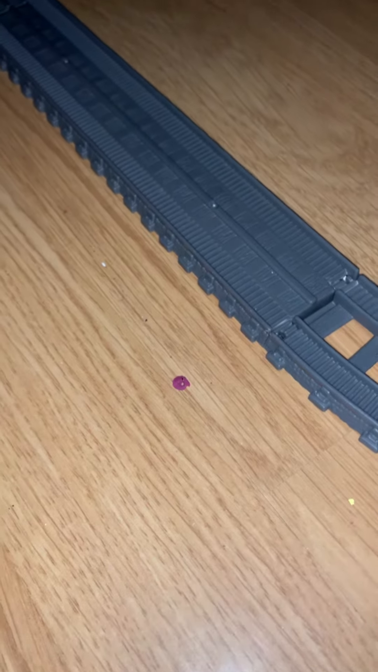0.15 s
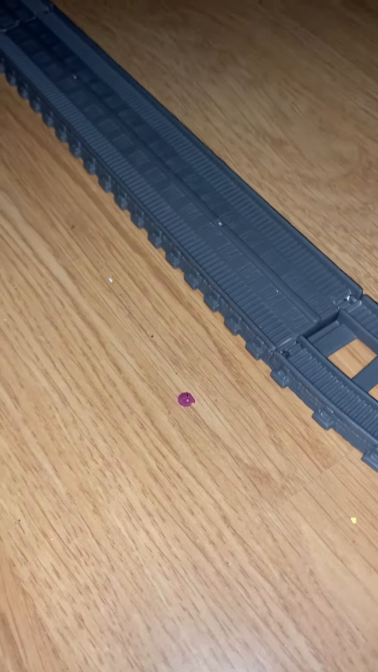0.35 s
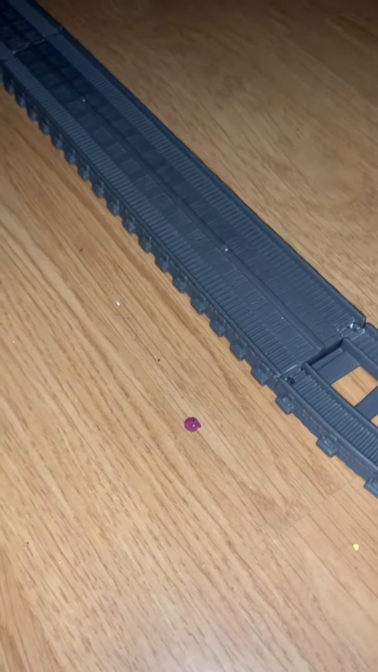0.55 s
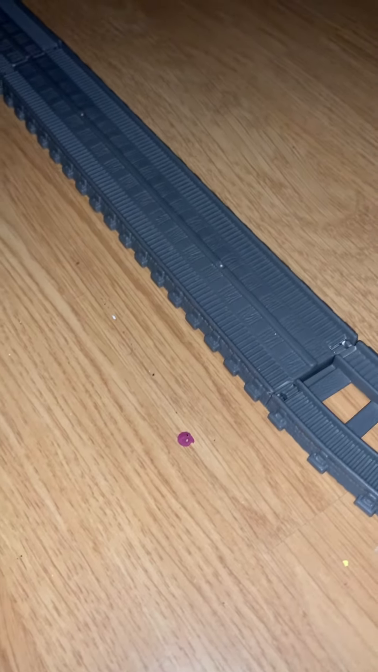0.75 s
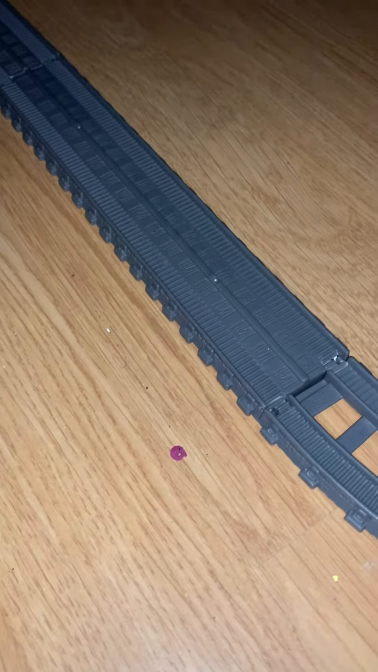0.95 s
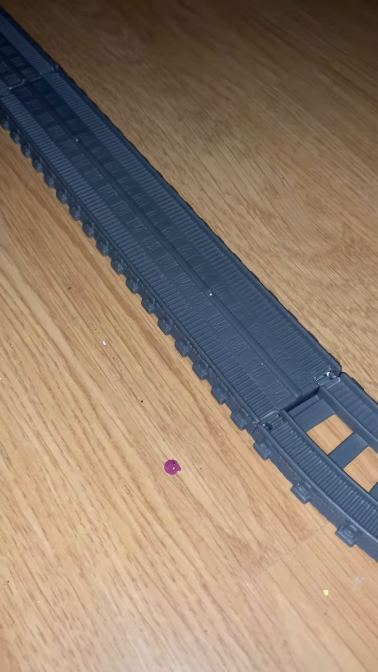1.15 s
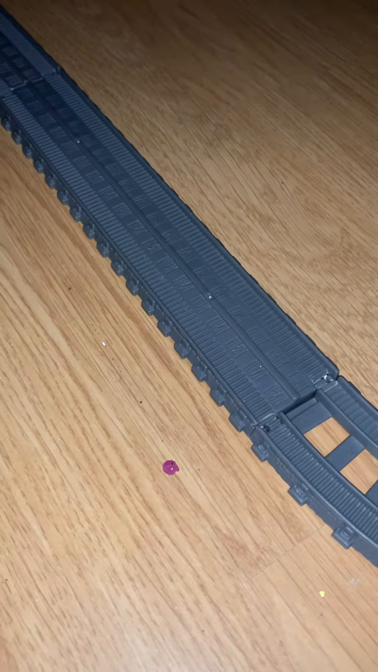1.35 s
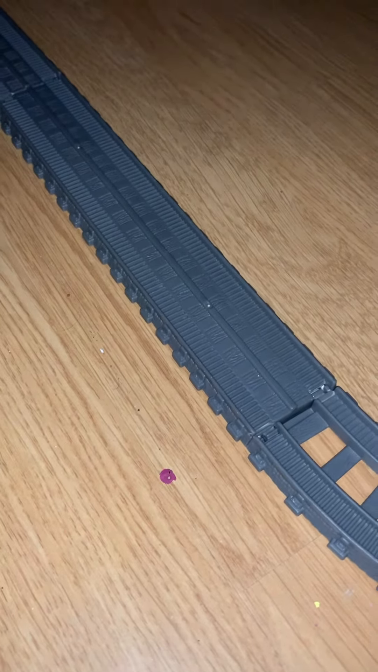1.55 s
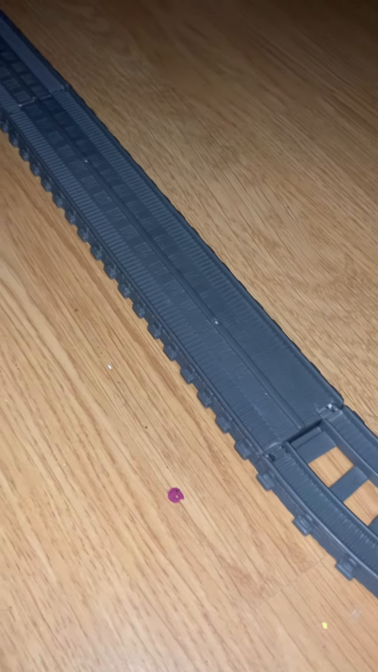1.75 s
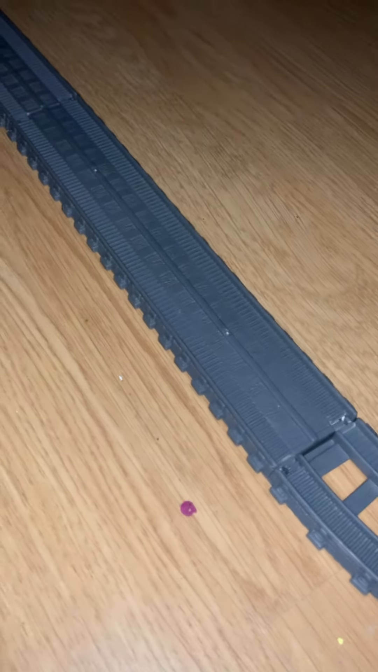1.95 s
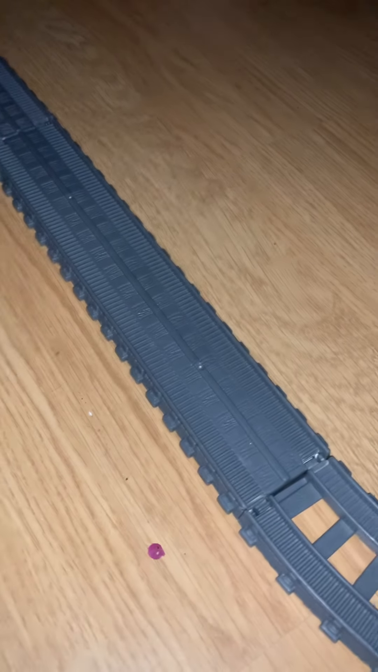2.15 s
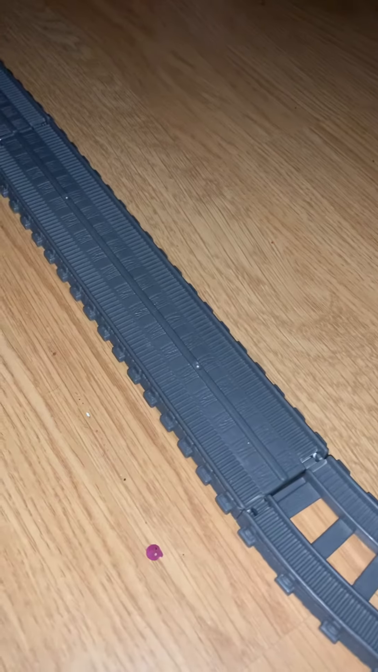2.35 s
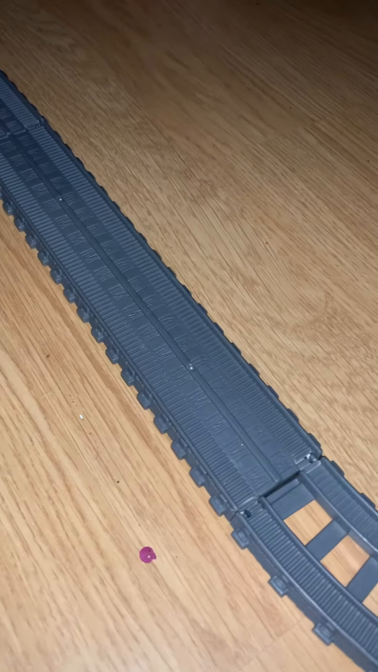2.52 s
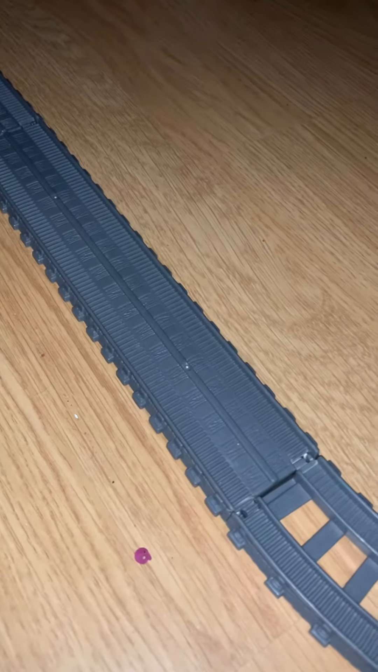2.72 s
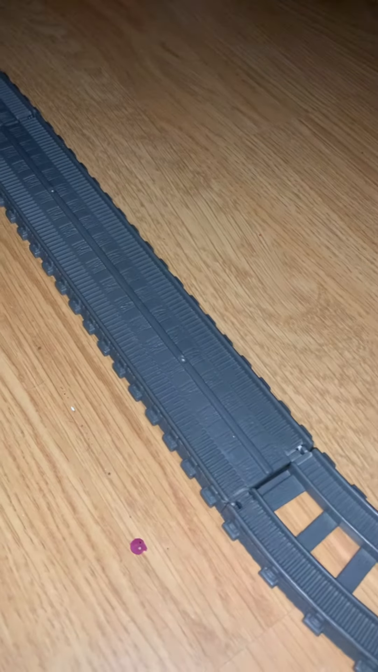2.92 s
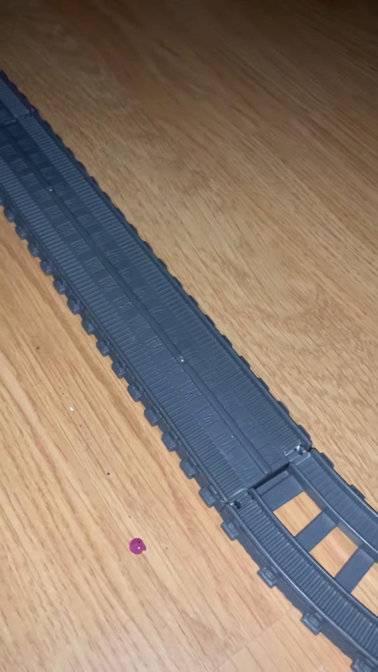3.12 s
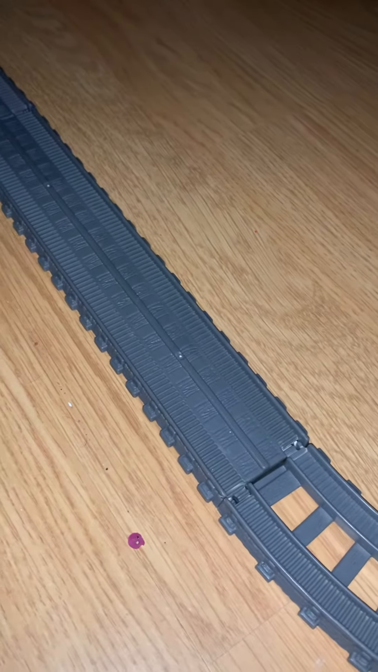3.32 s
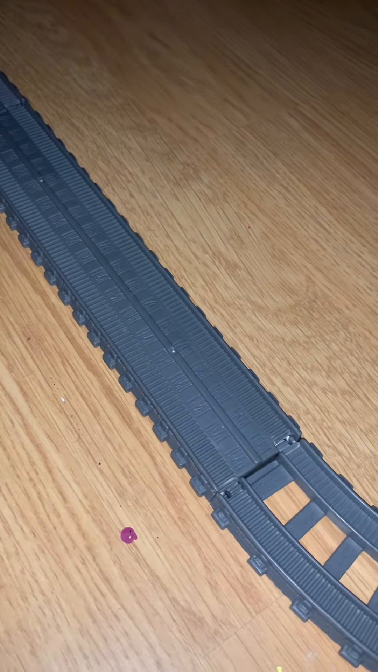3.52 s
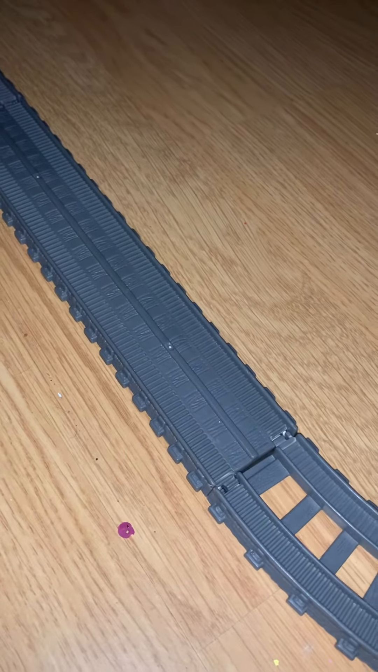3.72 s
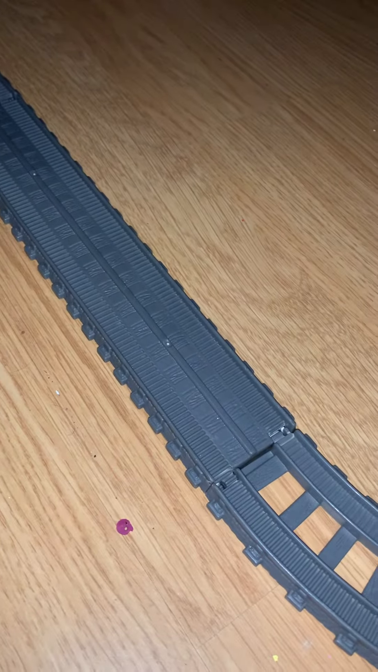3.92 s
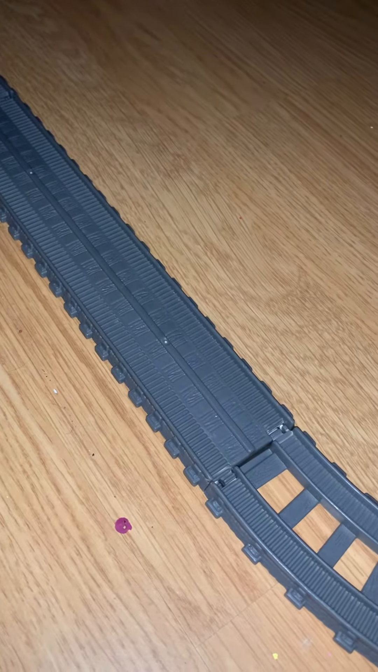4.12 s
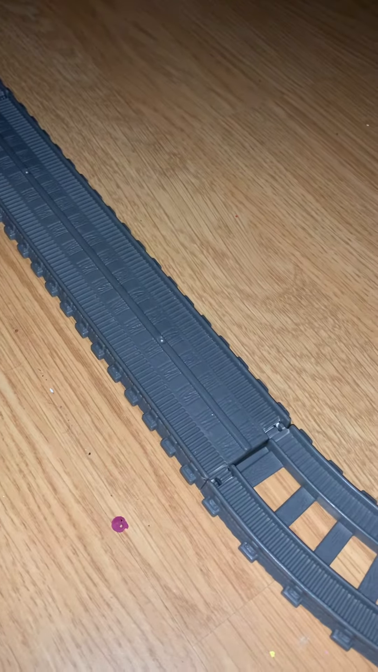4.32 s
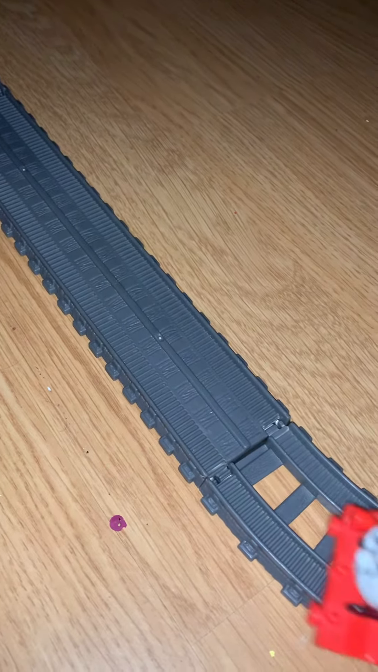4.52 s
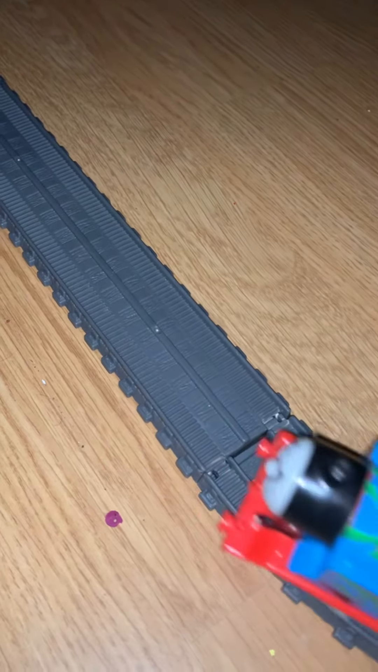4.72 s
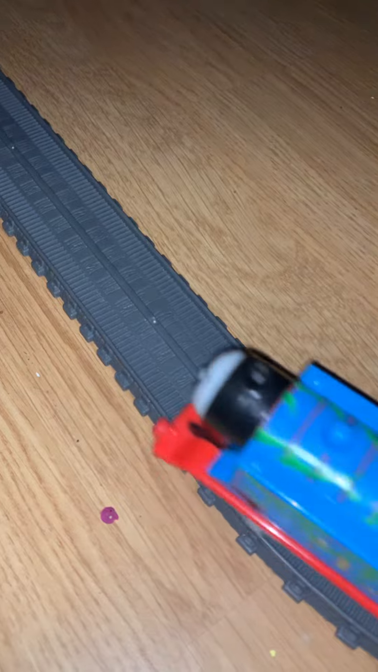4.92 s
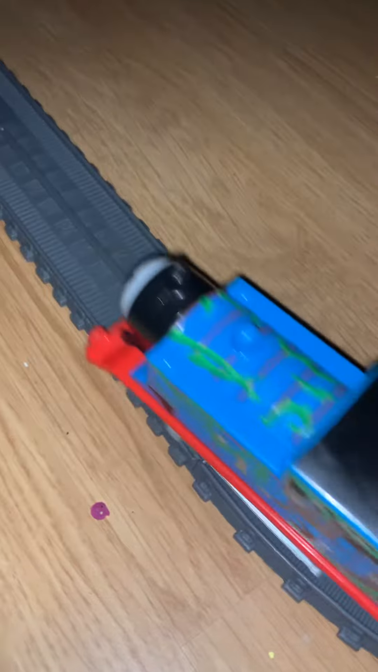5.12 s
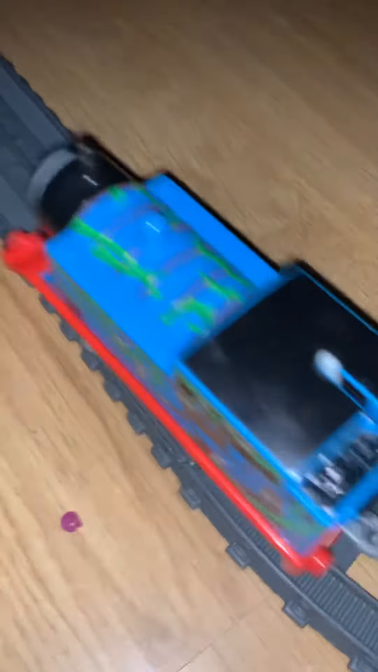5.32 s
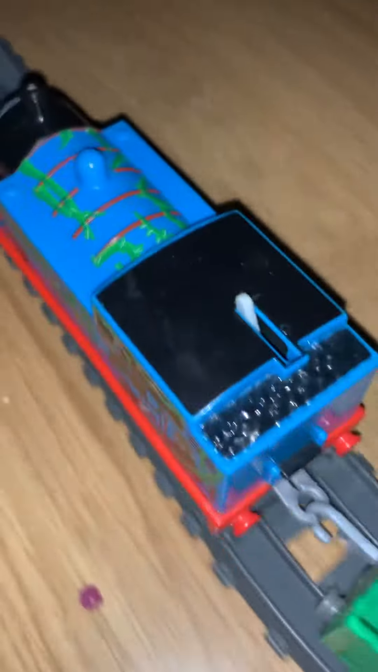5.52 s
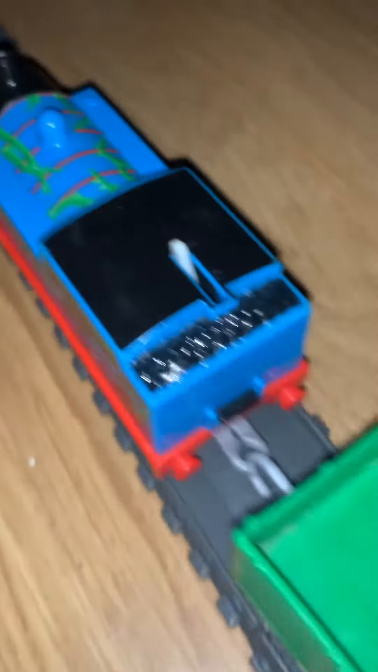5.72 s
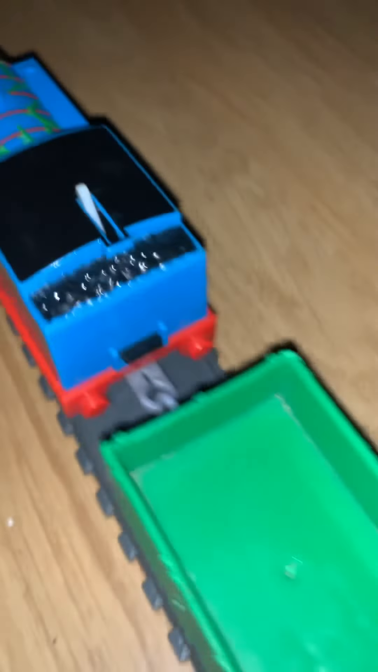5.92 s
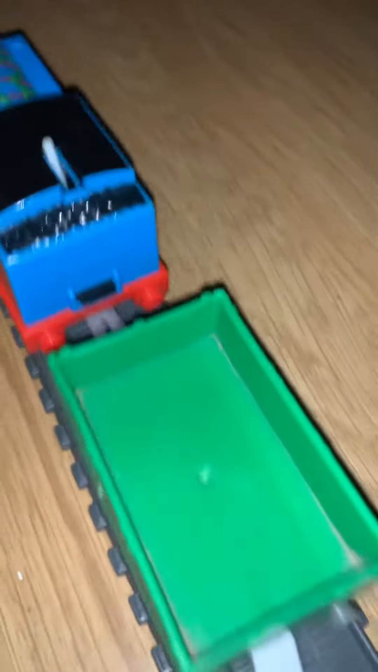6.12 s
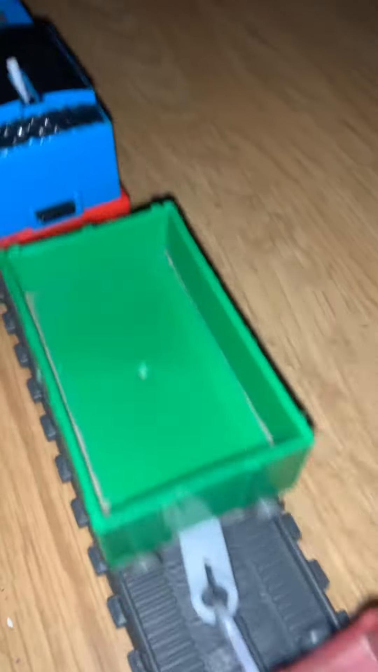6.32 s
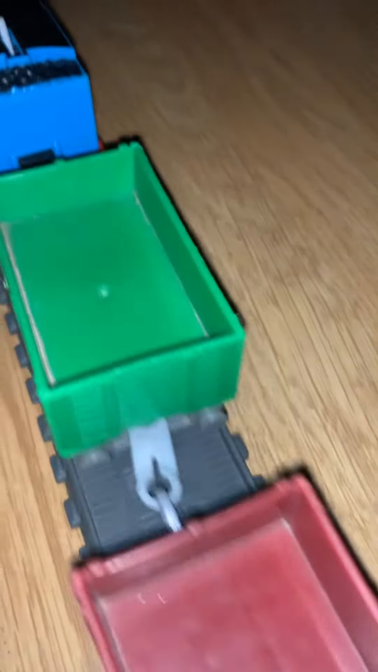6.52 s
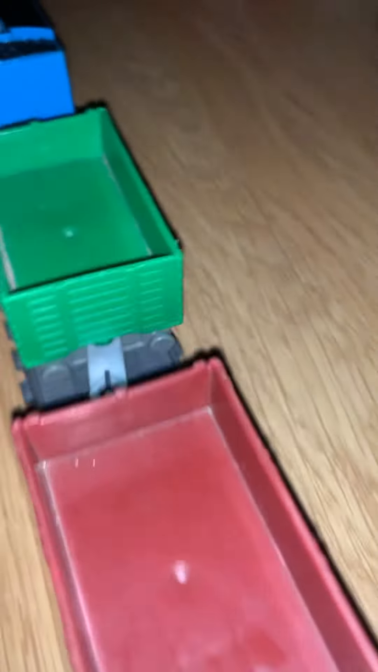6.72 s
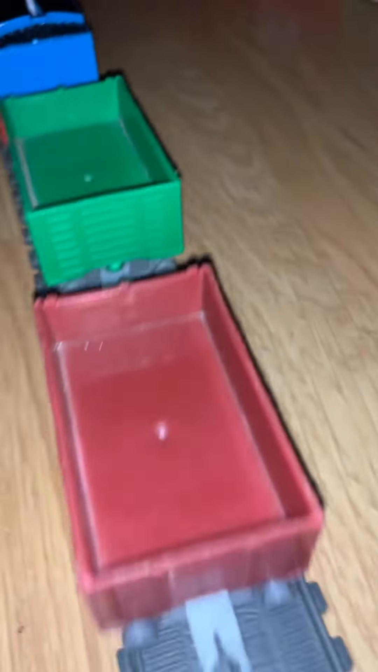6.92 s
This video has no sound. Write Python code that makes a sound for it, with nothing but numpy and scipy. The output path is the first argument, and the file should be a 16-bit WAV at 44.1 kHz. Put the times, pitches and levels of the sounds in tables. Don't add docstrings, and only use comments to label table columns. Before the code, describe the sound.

Uneven plastic ticking and gear whirr swell as a small toy train approaches on a wooden floor and passes the microphone with clacking wagons.

```python
import sys
import numpy as np
from scipy import signal
from scipy.fft import rfft, irfft, next_fast_len
from scipy.io import wavfile
from scipy.ndimage import map_coordinates

SR = 44100
rng = np.random.default_rng(int(sys.argv[2]) if len(sys.argv) > 2 else 0)


def invert_db(level):
    return 10 ** (np.asarray(level, dtype=float) / 20)


def pcm_store(signal):
    levels = np.round(np.clip(np.atleast_2d(signal), -1, 1) * 32767)
    wavfile.write(sys.argv[1], SR, levels.astype(np.int16).T)


N = 311346

# time in seconds, stage (0 far, 1 round the bend, 2 passing).
APPROACH = [
    (0, 0.04),
    (1.6, 0.034),
    (3.4, 0.69),
    (4.1, 0.81),
    (5.3, 1.34),
    (5.9, 2.01),
    (7.06, 1.74),
]
# time in seconds, shell rattle in dB, wheel pressure on the floor in dB.
RUN = [(0, -51.5, 1), (.75, -46.5, -0.5), (1.3, -46, -6), (1.58, -46.5, -4), (1.75, -44, 4),
       (2.4, -43, -4.5), (2.56, -36.5, -2), (2.85, -38.5, 1.5), (2.97, -45.5, 2), (3.8, -45.5, 0.5),
       (3.95, -37.5, -4.5), (4.5, -40.5, -0.5), (4.8, -41, -5.5), (5.15, -40.5, -4), (5.45, -32.5, -4.5),
       (5.67, -31, -6.5), (5.85, -28, -5), (7.06, -30, -4)]
# time in seconds, slack in dB.
SLACK = [(0, 1), (.85, -2.5), (.95, -3.5), (1.95, -2.5), (2.3, -4.5), (3.0, -1), (3.8, 0), (5.0, 2.5),
         (5.65, 4.5), (5.85, 1.5), (7.06, -1.5)]

# time in seconds, peak in dB, panel pitch in Hz.
ENGINE_KNOCKS = [(1.6244, -30, 1500), (1.732, -31, 1570), (2.0784, -24.5, 1840), (2.1204, -20.5, 2000),
                 (2.3444, -32, 1490), (2.5379, -49, 1570), (2.601, -26, 1490), (2.7851, -24, 1490),
                 (2.859, -21, 1910), (3.1473, -25.5, 1550), (3.278, -21.5, 1450), (3.298, -18.5, 1730),
                 (3.354, -22, 1500), (3.482, -28.5, 1530), (3.5224, -28, 1470), (3.6952, -23, 1800),
                 (3.895, -28.5, 1930), (4.2513, -37, 2070), (4.31, -21, 2000), (4.4473, -21, 2070),
                 (4.5332, -50, 2050), (4.5655, -37, 2160), (4.6412, -17, 2050), (4.6778, -28, 1770),
                 (4.8928, -22.5, 2050)]
WAGON_KNOCKS = [(4.956, -19, 1710), (4.991, -15, 1760), (5.01, -24, 1960), (5.0244, -14, 2000),
                (5.057, -19, 1830), (5.181, -29, 1700), (5.194, -18, 1680), (5.273, -22, 1940),
                (5.3374, -18.5, 1780), (5.3787, -16, 1680), (5.4067, -10.5, 1930), (5.467, -32, 1830),
                (5.624, -33, 1610), (5.8085, -14, 2010), (5.9464, -9, 2000), (6.0215, -11, 1840),
                (6.1067, -18, 2050), (6.3385, -32, 2060), (6.428, -30, 2060), (6.4934, -15, 2050),
                (6.545, -13.5, 1830), (6.7292, -14, 1890), (6.7422, -16, 2010), (6.8942, -16.5, 2290),
                (7.0427, -16, 2020)]
# time in seconds, peak in dB, panel pitch in Hz.
FURTHER_KNOCKS = [(1.0922, -42, 1530), (1.1303, -32.5, 1550), (1.5154, -40, 1570), (1.606, -40, 1560),
                  (1.734, -25, 1540), (1.794, -27, 1610), (1.8744, -36, 1540), (1.897, -37, 1440),
                  (1.907, -33, 1580), (2.1107, -30, 1730), (2.27, -26.5, 1590), (2.301, -28.5, 1560),
                  (2.415, -25.5, 1550), (2.468, -32, 1650), (2.541, -20, 1650), (2.6133, -22.5, 1590),
                  (2.6378, -23, 1580), (2.7305, -30, 1550), (2.789, -28, 1650), (2.8623, -20, 1850),
                  (3.041, -30, 1650), (3.0603, -29, 1590), (3.074, -32, 1580), (3.115, -29, 1500),
                  (3.1232, -23, 1450), (3.357, -34, 1640), (3.5339, -30, 1650), (3.7067, -24.5, 2000),
                  (3.994, -26, 1660), (4.0542, -25, 1800), (4.2281, -20, 2010), (4.254, -17.5, 2070),
                  (4.4, -21, 2020), (4.4261, -22, 2050), (4.534, -15.5, 2020), (4.569, -22, 2000),
                  (4.632, -18.5, 1900), (4.6348, -17, 2000), (4.6444, -13, 2050), (4.683, -20, 1860),
                  (4.7878, -22.5, 1970), (4.8283, -26.5, 1890), (4.846, -25.5, 1980), (4.9063, -24, 1810),
                  (5.1185, -23, 1800), (5.1831, -11.5, 1810), (5.1933, -13.5, 1740), (5.3803, -29, 1720),
                  (5.4053, -13, 1870), (5.4082, -11.5, 1940), (5.5146, -41, 1800), (5.5846, -23, 1980),
                     (5.6261, -13, 1760), (5.6686, -24, 2000), (5.7456, -18.5, 2360), (5.7723, -23, 2100),
                     (5.8226, -18, 2020), (5.957, -29, 2050), (6.0145, -16.5, 2070), (6.0493, -14, 1870),
                     (6.1212, -17.5, 2210), (6.1345, -34, 2080), (6.1588, -26, 2090), (6.1774, -22, 2020),
                     (6.2687, -16.5, 2260), (6.2844, -34, 2060), (6.293, -20, 2330), (6.3044, -20, 2270),
                     (6.3299, -17, 2300), (6.3484, -13, 2050), (6.397, -18, 2080), (6.419, -19, 1900),
                     (6.4513, -17, 1960), (6.4874, -19, 1840), (6.4956, -17, 1880), (6.5268, -18, 1890),
                     (6.5755, -18.5, 1750), (6.6063, -14, 2200), (6.6398, -14.5, 2200), (6.652, -15.5, 1730),
                     (6.662, -17, 2090), (6.686, -17, 1980), (6.7324, -21, 2050), (6.752, -17, 2370),
                     (6.7667, -19, 2080), (6.7794, -15.5, 2260), (6.8073, -12, 2000), (6.839, -17.5, 2000),
                     (6.924, -18, 2040), (6.9517, -30, 1840), (6.9831, -19, 2000), (7.0098, -15, 2160),
                     (7.0298, -13, 2090)]
# time in seconds, peak in dB.
PINGS = [(0.3878, -38), (0.6324, -38), (0.7392, -37), (0.8241, -35), (0.8928, -35), (1.0405, -39),
         (1.1345, -36), (1.2805, -35), (1.3637, -37), (1.4528, -36), (1.6267, -36), (1.7692, -36),
         (1.819, -36), (2.0446, -35), (2.0835, -34), (2.1763, -36), (2.4696, -34), (2.4869, -35),
         (2.6294, -28), (2.6407, -31), (2.7225, -34), (2.7865, -31), (2.8662, -31), (3.1148, -33),
         (3.2492, -34), (3.3, -25), (3.3668, -33),
         (3.5339, -32), (3.605, -33), (3.7081, -34), (3.8678, -35), (3.9105, -32), (3.9315, -35),
            (4.2373, -33), (4.3922, -35), (4.5325, -33), (4.959, -32), (4.9761, -30), (5.043, -28),
            (5.0568, -30), (5.0824, -32), (5.2217, -29), (5.4337, -24), (5.4455, -26), (5.5062, -27),
            (5.6161, -28), (5.7455, -23), (5.7896, -22), (5.8412, -23), (5.8838, -21), (5.9597, -22),
            (5.9781, -19), (6.0149, -21), (6.1228, -21), (6.1341, -23), (6.2552, -21), (6.2688, -19),
            (6.2774, -21), (6.3297, -20), (6.3876, -25), (6.3971, -24), (6.4756, -24), (6.5171, -22),
            (6.5454, -21), (6.6061, -22), (6.6208, -24), (6.6305, -23), (6.6971, -19), (6.7534, -21),
            (6.7992, -24), (6.9238, -26), (6.9402, -25), (7.0126, -28)]
# time in seconds, snap peak in dB, loose-part peak in dB.
JOINTS = [(0.2514, -55, -68), (0.336, -73, -45), (0.422, -55, -45.5), (0.624, -50, -47.5),
          (0.7956, -63, -57), (1.4463, -45, -48), (1.628, -52, -67), (1.7701, -46, -65), (2.0008, -40, -44),
          (2.078, -37, -51), (2.1168, -40, -43), (2.126, -38, -31.5), (2.467, -41, -46),
          (2.5329, -32.5, -35), (2.665, -39, -50), (2.839, -37.5, -43), (3.027, -46, -47.5),
          (3.148, -47.5, -53), (3.246, -47, -50), (3.275, -41, -45), (3.295, -40, -42), (3.3592, -50, -41),
          (3.484, -38, -58), (3.587, -47, -66), (3.667, -45, -61), (3.69, -42, -46), (3.8145, -46, -48),
          (3.8968, -36, -48), (3.927, -37, -48), (4.0465, -31, -39), (4.2237, -39, -37), (4.251, -37, -40),
          (4.32, -42, -41), (4.4465, -42, -39), (4.5408, -51, -35.5)]
COUPLINGS = [(4.644, -48, -28.5), (4.996, -40.5, -32), (5.183, -36, -44), (5.1955, -25, -32.5),
             (5.273, -38, -40), (5.3925, -27, -45), (5.405, -37, -23), (5.4315, -53, -31),
             (5.466, -35.5, -39), (5.4847, -32, -38), (5.602, -33, -31), (5.627, -43, -49),
             (5.849, -31, -26.5), (5.977, -51, -47), (6.109, -48, -31.5), (6.484, -51, -31),
             (6.523, -42, -33), (6.666, -34.5, -31), (6.73, -43, -36), (6.8265, -37, -39),
             (6.9102, -33, -32), (6.998, -35, -57)]
# time in seconds, peak in dB.
CRACKS = [(1.7668, -67), (2.0776, -68), (2.126, -68), (2.4652, -62), (2.533, -65), (2.8608, -58),
          (3.2424, -62), (3.3596, -59), (3.483, -58), (3.8964, -60), (4.046, -54), (4.2915, -55),
          (4.3185, -58), (4.531, -60.5), (4.6402, -50), (4.9964, -50), (5.0553, -57), (5.18, -47),
          (5.195, -44), (5.2733, -59), (5.3865, -51), (5.405, -39), (5.4657, -49), (5.605, -58),
          (5.627, -49), (5.849, -52.5), (5.9812, -56), (6.485, -59), (6.523, -51), (6.6656, -58),
          (6.73, -52.5), (6.8462, -62), (6.8986, -59), (6.9949, -58)]
# time in seconds, peak in dB.
BUMPS = [(0.206, -34), (0.291, -39), (0.335, -38), (1.092, -33), (1.36, -31), (1.497, -35), (1.708, -21),
         (1.789, -22), (2.046, -28), (2.126, -19.5), (2.532, -38), (2.839, -42), (3.528, -22.5),
         (3.738, -34), (4.11, -21.5), (4.643, -47), (4.999, -18), (5.492, -32), (5.58, -24.5), (5.732, -23),
         (5.934, -20), (6.392, -24), (6.761, -38)]
# time in seconds, peak in dB.
THUMPS = [(2.78, -52), (2.866, -45), (4.459, -51), (4.634, -44), (4.858, -36.5), (5.107, -31), (5.235, -30),
          (5.4, -49), (5.738, -35), (5.841, -33.5), (5.991, -37), (6.253, -32), (6.623, -36)]

# centre in Hz, width in Hz, level in dB.
TRACK_MODES = [
    [(433, 85, -7), (518, 146, -5), (669, 50, -6), (950, 910, -17.5)],
    [(357, 127, -4), (467, 202, -1), (621, 133, -2), (851, 64, -3)],
    [(310, 240, -9), (496, 220, -2), (677, 132, 4), (912, 165, -1.5)],
]
SHELL_MODES = [
    [(1305, 214, -1.3), (1550, 152, 1.2), (2020, 143, 1.5), (2520, 340, 0.97)],
    [(1332, 450, -5), (1650, 590, 5), (2000, 1090, 1.5), (2872, 330, -2)],
    [(1103, 160, -8.5), (1766, 350, -1), (2050, 850, -0.5), (2547, 484, 1.5)],
]
LOOSE_MODES = [
    [(3420, 180, -24), (3470, 206, 9.5), (4234, 760, -3), (4584, 110, 4)],
    [(2890, 290, 8.5), (3770, 690, -1.5), (4580, 130, -1)],
    [(3080, 565, 0.5), (3580, 800, -0.5), (4540, 490, -9.5)],
]
# frequency in Hz, level in dB.
AXLE_MODES = [(2420, -1), (3500, -8), (4650, -13), (5700, -20)]
# frequency in Hz, density in dB.
SNAP = [(3000, -22.5), (5000, 4.5), (6000, -0.5), (7000, -10.5), (8500, -14.5), (10000, -17.5),
        (12500, -60), (13400, -43), (14200, -47), (16000, -77)]
RUMBLE = [(20, -38), (35, -11.5), (60, -7), (120, 0), (220, 1.5), (320, 2.5), (600, -50)]
HUSH = [(100, -26), (500, 43), (3000, -52), (10500, -43.5), (11200, -23), (13400, -27.5), (13900, -47.5)]
CRACK = [(4000, -27), (6300, 5), (8300, 4.5), (10000, -4.5), (12500, -1), (15000, -15)]

# frequency in Hz, T60 in seconds.
ROOM_T60 = [(200, .14), (2000, .09), (10000, .05)]
# frequency in Hz, level in dB.
WALLS = [(60, -3), (300, -6.5), (700, -5.5), (2500, -1), (3500, 0.5), (4800, 2.5), (7000, 6.5), (9500, 9.5)]
# frequency in Hz, left lead in radians.
LEAD_FAR = [(50, -.2), (300, -.6), (600, -2), (1100, -2.2), (1400, -.8), (1800, .5), (2200, 3.1), (3500, 3),
            (4100, 1), (4450, -3.1), (8400, -3.6), (10300, -3.1), (11300, -.1)]
LEAD_BEND = [(50, -.2), (300, -.7), (700, -2), (1100, -2.2), (1400, -.3), (2050, .2), (2350, 3),
             (3500, 2.4), (4100, .6), (4500, -3.1), (5900, -3.3), (7000, -5.8), (9500, -3.1), (10400, -2.9),
             (11300, -.1)]
LEAD_NEAR = [(50, -.2), (300, -.4), (600, -.8), (800, .2), (1250, -.8), (2000, 1.2), (2500, 2.4), (3200, 3),
             (3900, .8), (4600, -3.1), (5700, -3.1), (6300, -6.4), (9500, -3.1), (10400, -2.9),
             (11300, -.1)]
# frequency in Hz, left minus right in dB.
LEAN = [
    [(300, 0), (480, 2), (800, 0), (1100, 0), (1400, -3.5), (1900, -1), (4000, 0)],
    [(500, 0), (1100, -1.5), (1800, -5.5), (2300, -1), (3000, -3.5), (4200, 0)],
    [(500, 0), (700, -3.5), (1200, -1.5), (2000, -7), (2800, -5), (4300, 0)],
]
# frequency in Hz, gain in dB.
WIDTH = [
    [(300, -2), (900, 1), (4200, 1), (4600, 3), (6200, 0), (10000, -2)],
    [(300, -2), (900, 0), (1500, 2), (2000, 0), (2500, -4), (3600, -4), (4200, 0), (6000, -2)],
]
ALIKE = [
    [(2700, 0), (3050, -4), (3350, 0), (4500, 0), (4800, -10), (5900, -7), (8300, -5), (10500, -10), (11200, 0)],
    [(4400, 0), (4800, -7), (5600, -5), (6200, -1), (8200, -1), (8900, -10), (10600, -10), (11200, 3), (13300, 2), (13800, -14)],
]

SHELL_DB, TRACK_DB, LOOSE_DB, RUMBLE_DB = -3, (2, 3.5, -1.5), (-3.5, -8, -12.5), (-13.5, -8, -10.5)
RUMBLE_FOLLOWS = 0.98
SWAY_DB, SWAY_PER_S = 1.5, 9
TICK_COUNT, STRAY_COUNT = 1800, 70
TICK_DB, TICK_SPREAD_DB = -13, 1.5
JOLT_DB, JOLT_S, JOLT_RISE_S = -20, 0.0096, 0.0061
JOLT_IN_TRACK = 0.52
KNOCK_LAG_S, BUMP_LAG_S = 0.00175, 0.00295
TAP_LEAN_DB, PING_IN_PHASE = 2, 0.16
HALF_CANCEL_UNTIL_S = .9
CRACK_DB, CRACK_S = 8, 0.0012


def unit(x):
    return x / np.sqrt(np.mean(x ** 2) + 1e-20)


def along(points, hz):
    f, v = np.transpose(points)
    return np.interp(np.log(hz + 1), np.log(f + 1), v)


def over_time(points):
    return np.interp(np.arange(N) / SR, *np.transpose(points))


def wobble(rate_per_s):
    knots = rng.standard_normal(int(N * rate_per_s / SR) + 4)
    return map_coordinates(knots, [np.arange(N) * rate_per_s / SR])


def filtered(x, response):
    m = next_fast_len(N + SR // 4)
    return irfft(rfft(x, m) * response(np.fft.rfftfreq(m, 1 / SR)), m)[..., :N]


def impulses(seconds, sizes):
    return np.bincount((seconds * SR).astype(int), sizes, N)


def placed(seconds, rows):
    where = (seconds * SR).astype(int)[:, None] + np.arange(rows.shape[1])
    return np.bincount(where.ravel(), rows.ravel(), N + SR)


def bursts(seconds, sizes, swell_s):
    t = np.arange(-SR // 50, SR // 50 + 1) / SR
    envelope = signal.fftconvolve(impulses(seconds, sizes), np.exp(-.5 * (t / swell_s) ** 2), "same")
    return envelope * rng.standard_normal(N)


def chirrups(seconds, pitch_hz, peak_db, swell_s):
    t = np.arange(-SR // 50, SR // 50) / SR
    shape = np.exp(-.5 * (t / np.where(t < 0, swell_s, 1.24 * swell_s)) ** 2)
    cycles = pitch_hz[:, None] * t + rng.random((len(seconds), 1))
    rows = invert_db(peak_db)[:, None] * shape * np.sin(2 * np.pi * cycles)
    return placed(seconds, rows)[SR // 50:][:N]


def body(stages, low_hz, high_hz):
    def response(f):
        edge = (1j * f / (low_hz + 1j * f) * high_hz / (high_hz + 1j * f)) ** 2
        out = []
        for modes in stages:
            h = 0
            for k, (hz, width_hz, db) in enumerate(modes):
                band = 1j * f * width_hz
                h = h + (-1) ** k * invert_db(db) * band / (hz * hz - f * f + band)
            h = edge * h
            out.append(h / np.sqrt(np.mean(abs(h) ** 2)))
        return np.array(out)
    return response


def approach_stage():
    return np.clip(over_time(APPROACH), 0, 2)


def hush():
    return invert_db(-58.5) * unit(filtered(rng.standard_normal(N), lambda f: invert_db(along(HUSH, f))))


def room(x):
    hop = SR // 6
    fade = np.sin(np.pi * np.arange(2 * hop) / (2 * hop))
    out = np.zeros((2, N + 2 * SR))
    x = np.pad(x, (hop, 2 * hop))
    for start in range(0, N + hop, hop):
        hz, t, z = signal.stft(rng.standard_normal((2, SR // 4)), SR, nperseg=256)
        z[1] = np.where(hz[:, None] < 100, z[0], z[1])
        decay = invert_db(-60 * t / along(ROOM_T60, hz)[:, None])
        tail = signal.istft(z * decay, SR, nperseg=256)[1]
        piece = x[start:start + 2 * hop] * fade
        wet = signal.fftconvolve(piece[None], tail / np.linalg.norm(tail[0]), axes=1)
        out[:, start:start + wet.shape[1]] += wet
    return filtered(out[:, hop:hop + N], lambda f: invert_db(along(WALLS, f)))


def thumps():
    t = np.arange(SR // 8) / SR
    pitch_hz = 48 + 90 * np.exp(-t / 0.012)
    swing = np.sin(2 * np.pi * np.cumsum(pitch_hz) / SR) * (t / 0.015) * np.exp(1 - t / 0.012)
    s, db = np.transpose(THUMPS)
    return signal.fftconvolve(impulses(s, invert_db(db - 5.0)), swing)[:N]


def cracks():
    s, db = np.transpose(CRACKS)
    t = np.arange(SR // 100) / SR
    grit = np.sign(rng.standard_normal((len(s), len(t))))
    rows = invert_db(db + CRACK_DB)[:, None] * np.exp(-t / CRACK_S) * grit
    return filtered(placed(s, rows)[:N], lambda f: invert_db(along(CRACK, f)))


def pings():
    s, db = np.transpose(PINGS)
    out = np.zeros(N)
    for hz, mode_db in AXLE_MODES:
        pitch_hz = hz * invert_db(.4 * rng.standard_normal(len(s)))
        out += chirrups(s, pitch_hz, db + mode_db + 3 * rng.random(len(s)) - 4, 0.0009)
    return out


def further_knocks():
    s, db, hz = np.transpose(FURTHER_KNOCKS)
    return chirrups(s, hz, db - 4.0, 0.00079)


def bumps():
    s, db = np.transpose(BUMPS)
    pitch_hz = 510 * invert_db(.6 * rng.standard_normal(len(s)))
    return chirrups(s + BUMP_LAG_S, pitch_hz, db - 6.0, 0.0014)


def knocks():
    s, db, hz = np.transpose(ENGINE_KNOCKS + WAGON_KNOCKS)
    return chirrups(s + KNOCK_LAG_S, hz, db - 8.0, 0.00092)


def jolts():
    s, db, _ = np.transpose(ENGINE_KNOCKS + WAGON_KNOCKS)
    t = np.arange(-SR // 4, SR // 4 + 1) / SR
    shake = np.exp(-abs(t) / np.where(t < 0, JOLT_RISE_S, JOLT_S))
    return abs(signal.fftconvolve(impulses(s, invert_db(db + JOLT_DB)), shake, "same"))


def clicks(stray_level_db):
    s, snap_db, _ = np.transpose(JOINTS + COUPLINGS)
    stray_s = (np.arange(STRAY_COUNT) + rng.random(STRAY_COUNT)) / STRAY_COUNT * (N - 1) / SR
    stray_db = stray_level_db[(stray_s * SR).astype(int)] + TICK_DB
    stray_db = stray_db + TICK_SPREAD_DB * rng.standard_normal(STRAY_COUNT)
    x = bursts(s, invert_db(snap_db + 1.5), 0.00027) + bursts(stray_s, invert_db(stray_db), 0.0011)
    return filtered(x, lambda f: unit(invert_db(along(SNAP, f) + 13.3 * np.log2(1 + f / 5000))))


def train():
    stage = approach_stage()
    s, run_db, press_db = np.transpose(RUN)
    run_db, press_db = over_time(np.transpose([s, run_db])), over_time(np.transpose([s, press_db]))

    def staged(values):
        return np.interp(stage, np.arange(3), values)

    def sway():
        return SWAY_DB * wobble(SWAY_PER_S)

    calm_db = run_db + SHELL_DB + sway()
    shell_db = 20 * np.log10(invert_db(calm_db) + jolts())
    not_taken_db = (1 - JOLT_IN_TRACK) * (shell_db - calm_db)
    track_db = staged(TRACK_DB) + press_db - not_taken_db + sway()
    loose_db = staged(LOOSE_DB) + over_time(SLACK) + sway()
    rumble_db = staged(RUMBLE_DB) - not_taken_db + RUMBLE_FOLLOWS * press_db

    ticks_s = (np.arange(TICK_COUNT) + rng.random(TICK_COUNT)) / TICK_COUNT * (N - 1) / SR
    strength = np.clip(rng.standard_normal((TICK_COUNT, 4)), -1.5, 1.5)

    def rattle(part, level_db, shared_db, own_db, whirr, swell_s):
        sizes = invert_db(shared_db * strength[:, 0] + own_db * strength[:, part])
        ticking = unit(bursts(ticks_s, sizes, swell_s))
        return invert_db(level_db) * unit(ticking + whirr * rng.standard_normal(N))

    track = rattle(1, shell_db + track_db, 1.5, 3, .9, .003)
    shell = rattle(2, shell_db, 2.5, 2.5, .6, .001)
    loose = rattle(3, shell_db + loose_db, 3, 3, .55, .0008)
    click_s, _, jingle_db = np.transpose(JOINTS + COUPLINGS)
    loose += bursts(click_s, invert_db(jingle_db + 5.5), 0.00089)
    snap = rattle(3, shell_db + loose_db - 12.5, 0.88, 5.9, 0.47, 0.00061)
    rumble = rattle(1, shell_db + rumble_db, 1.6, 0.92, 0.68, 0.0021)

    plain = filtered(snap, lambda f: unit(invert_db(along(SNAP, f))))
    plain += filtered(rumble, lambda f: unit(invert_db(along(RUMBLE, f))))
    plain += clicks(calm_db + loose_db) + knocks() + bumps()
    rung = filtered(track, body(TRACK_MODES, 222, 754))
    rung += filtered(shell, body(SHELL_MODES, 810, 2470))
    rung += filtered(loose, body(LOOSE_MODES, 2650, 6100))
    return (rung + plain) * np.sqrt(np.clip(1 - abs(stage - np.arange(3)[:, None]), 0, 1))


def ports(x, lead, lean):
    def response(f):
        turn = np.exp(.5j * along(lead, f)) * invert_db(.5 * along(lean, f))
        return np.array([turn, 1 / turn])
    return filtered(x, response)


def spread(pair):
    near = approach_stage() / 2

    def shaped(x, curves):
        far_and_near = filtered(x, lambda f: np.array([invert_db(along(c, f)) for c in curves]))
        return np.sum(far_and_near * [1 - near, near], axis=0)

    plain = (pair[0] + pair[1]) / 2
    uncancelled = np.clip(20 * (HALF_CANCEL_UNTIL_S - np.arange(N) / SR), 0, .5)
    mid = uncancelled * plain + (1 - uncancelled) * shaped(plain, ALIKE)
    side = shaped((pair[0] - pair[1]) / 2, WIDTH)
    return np.array([mid + side, mid - side])


def scene():
    stages, tap, ping = train(), further_knocks(), pings()
    views = zip(stages, (LEAD_FAR, LEAD_BEND, LEAD_NEAR), LEAN)
    direct = sum(ports(x, lead, lean) for x, lead, lean in views)
    close = tap * invert_db([[-TAP_LEAN_DB], [TAP_LEAN_DB]])
    close = close + ping * [[PING_IN_PHASE + 1], [PING_IN_PHASE - 1]]
    answer = room(invert_db([-5, -4, -3.5]) @ stages + invert_db(-3.0) * (tap + ping))
    return spread(direct + close + answer) + thumps() + cracks() + hush()


def roll_off(x):
    return signal.sosfilt(signal.butter(12, 14230, fs=SR, output="sos"), x)


def record(dry):
    x = filtered(dry, lambda f: invert_db(-40 * (f > 14200)))
    return roll_off(x)


dry = scene()
out = record(dry)
pcm_store(out)
```